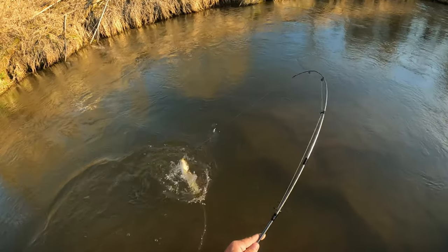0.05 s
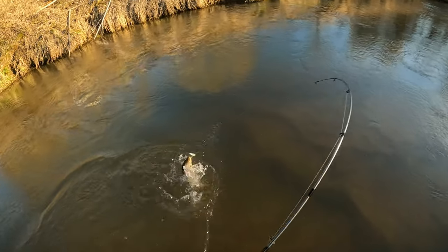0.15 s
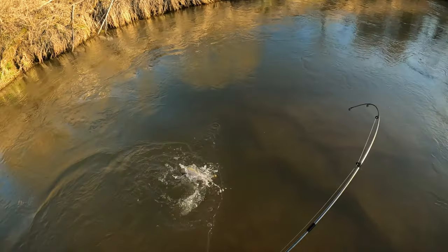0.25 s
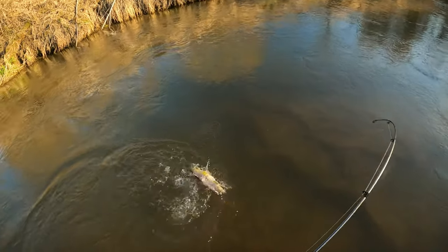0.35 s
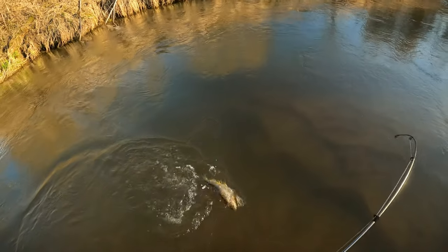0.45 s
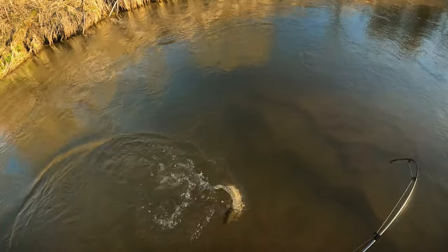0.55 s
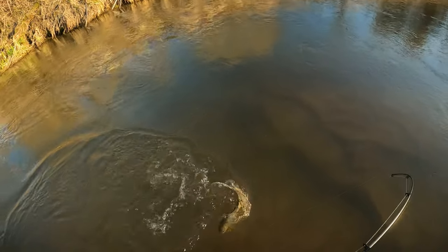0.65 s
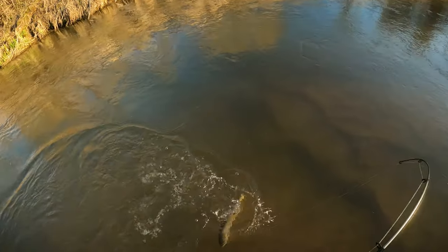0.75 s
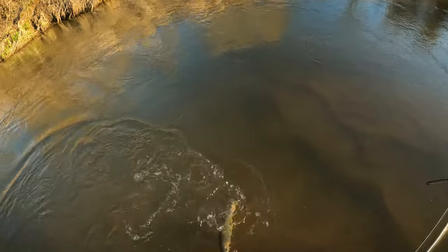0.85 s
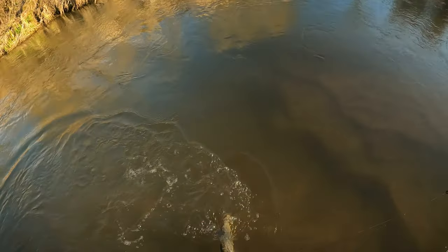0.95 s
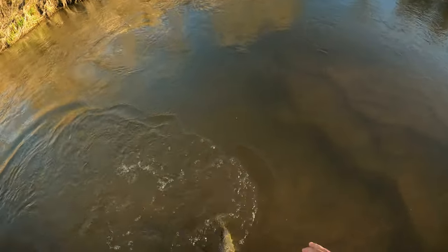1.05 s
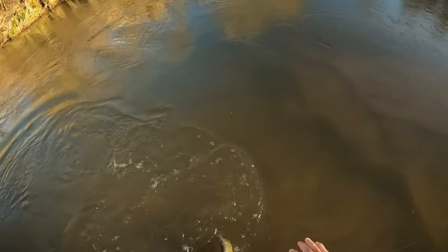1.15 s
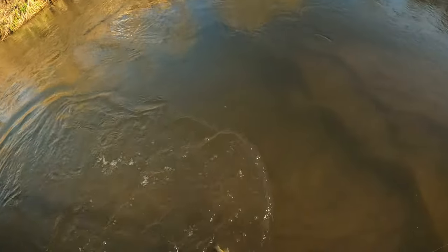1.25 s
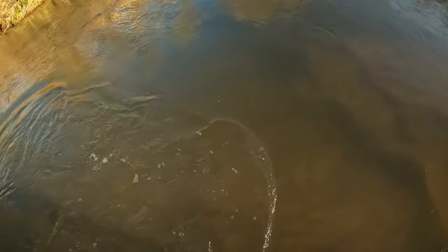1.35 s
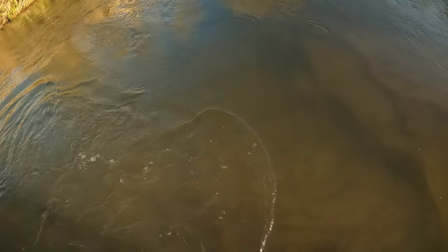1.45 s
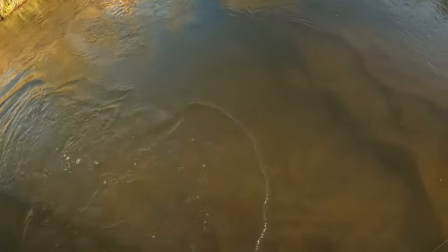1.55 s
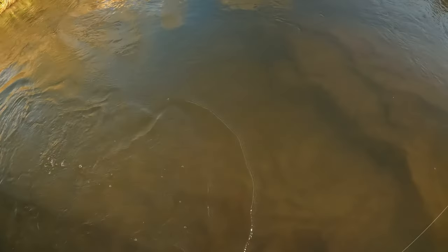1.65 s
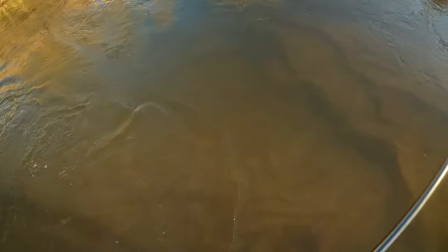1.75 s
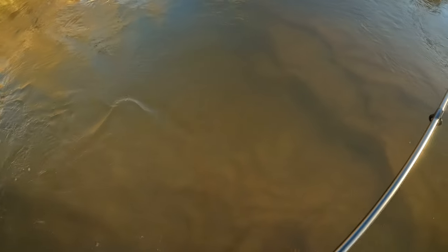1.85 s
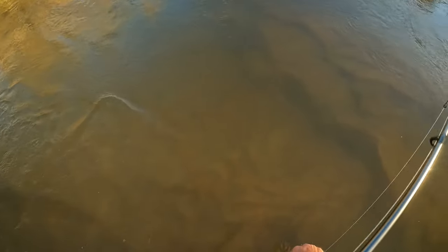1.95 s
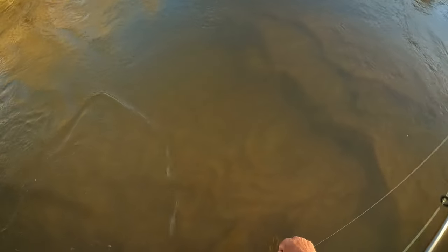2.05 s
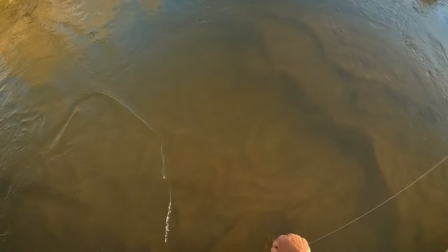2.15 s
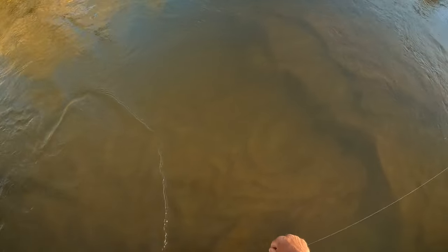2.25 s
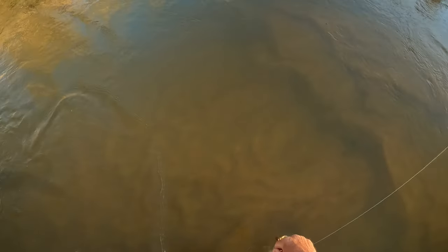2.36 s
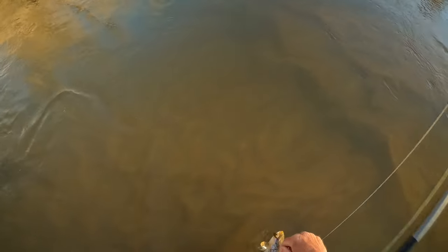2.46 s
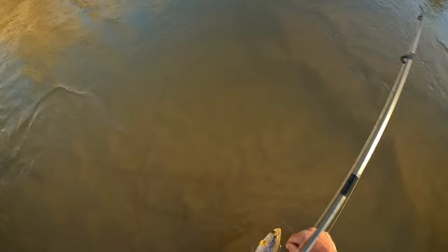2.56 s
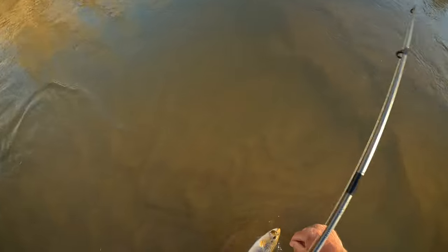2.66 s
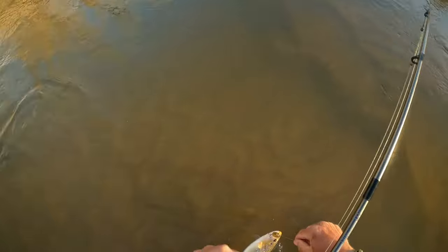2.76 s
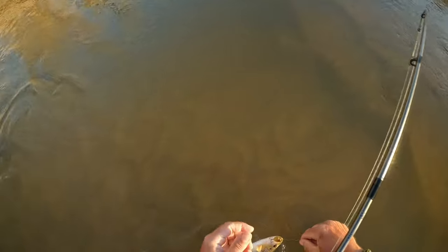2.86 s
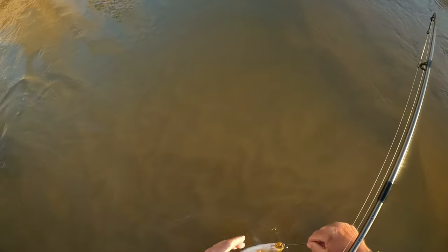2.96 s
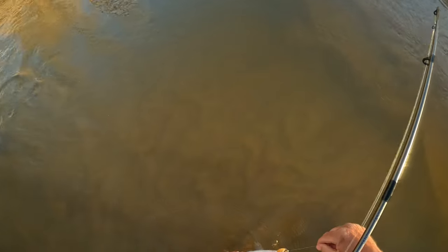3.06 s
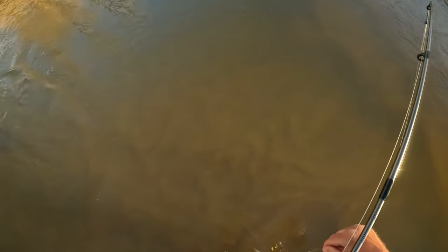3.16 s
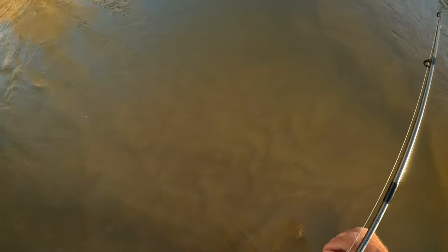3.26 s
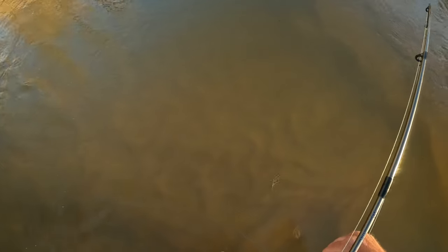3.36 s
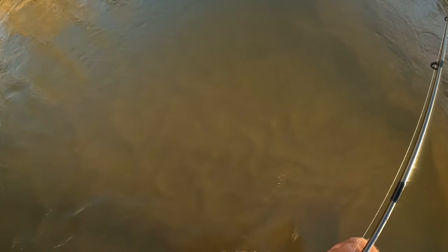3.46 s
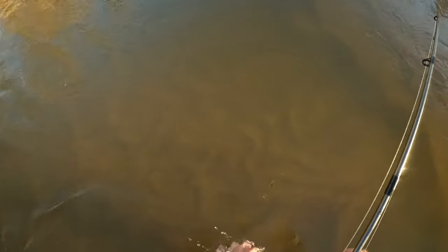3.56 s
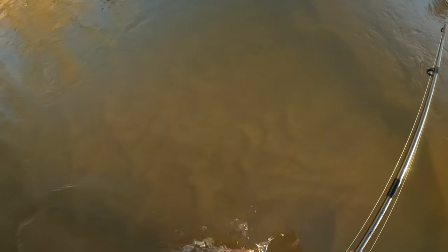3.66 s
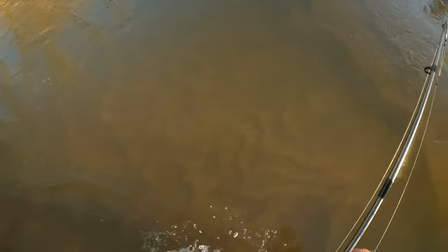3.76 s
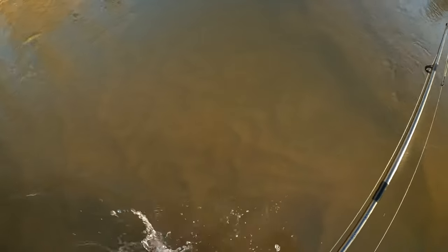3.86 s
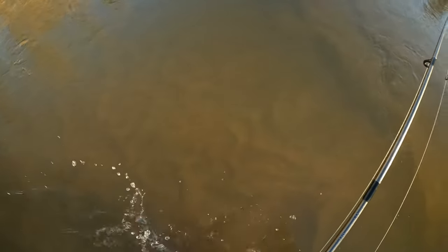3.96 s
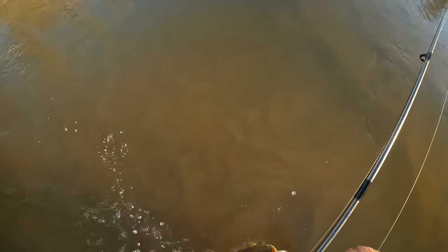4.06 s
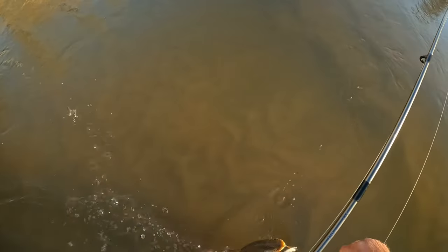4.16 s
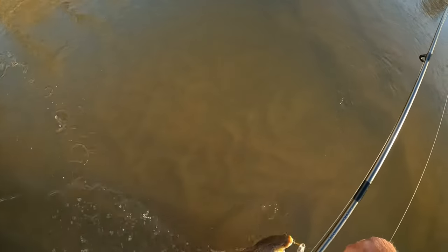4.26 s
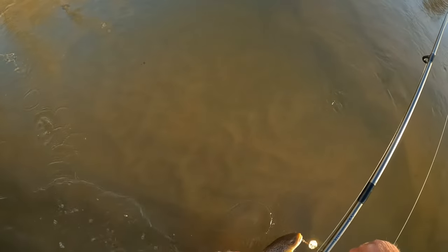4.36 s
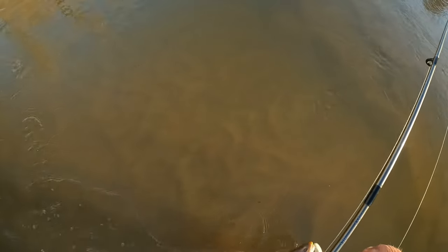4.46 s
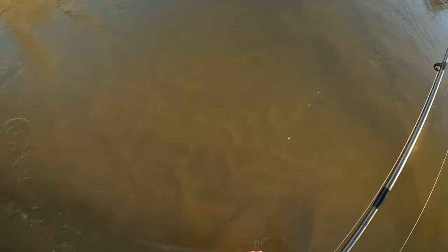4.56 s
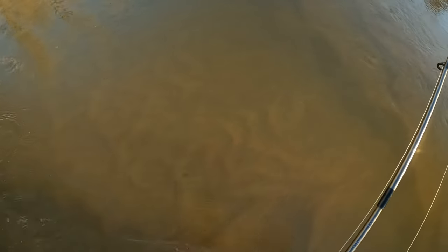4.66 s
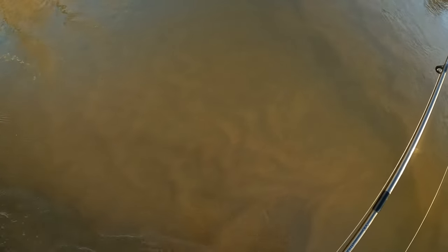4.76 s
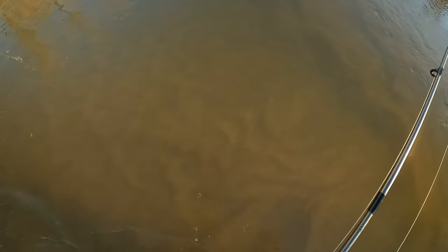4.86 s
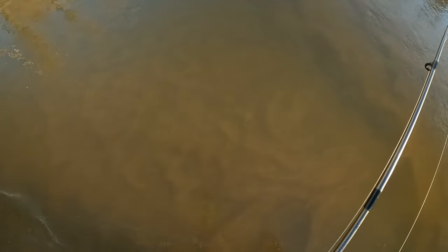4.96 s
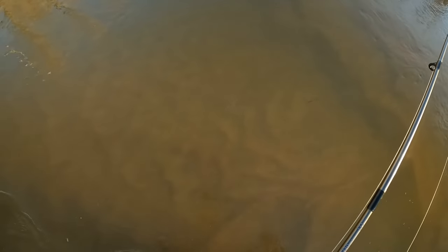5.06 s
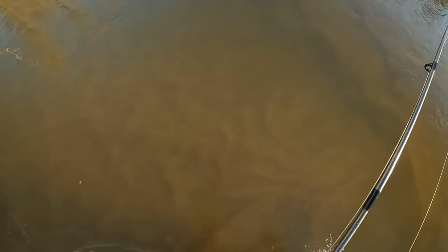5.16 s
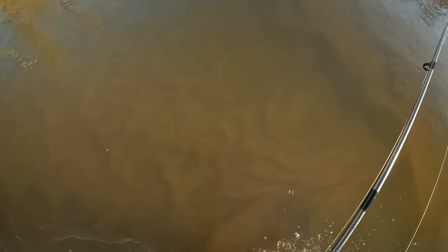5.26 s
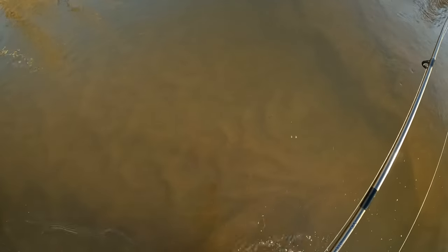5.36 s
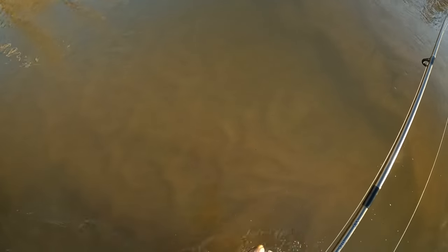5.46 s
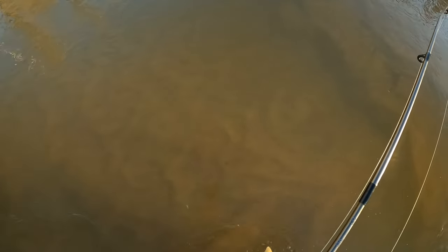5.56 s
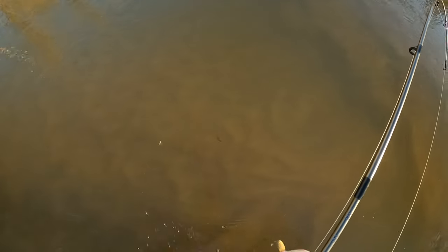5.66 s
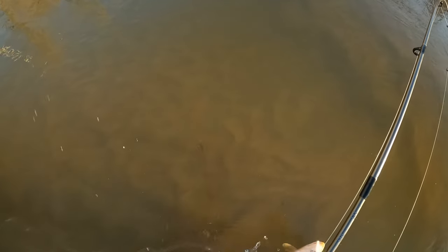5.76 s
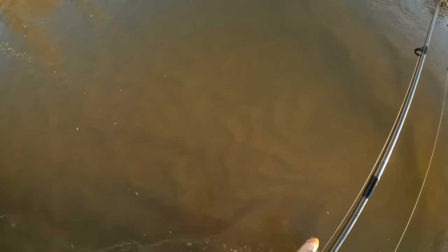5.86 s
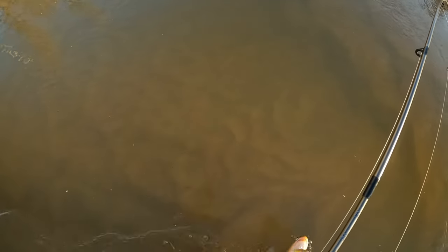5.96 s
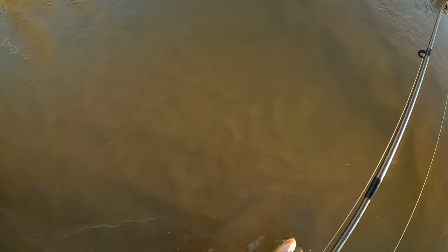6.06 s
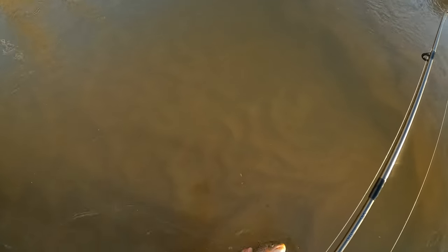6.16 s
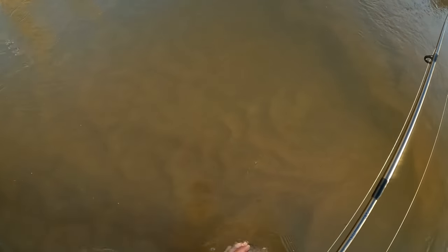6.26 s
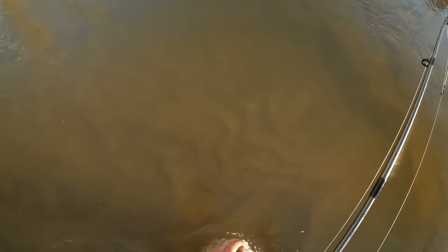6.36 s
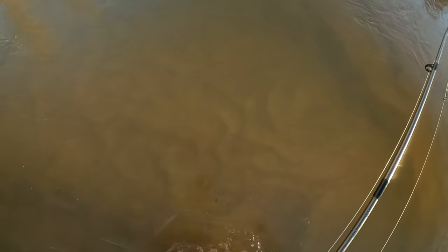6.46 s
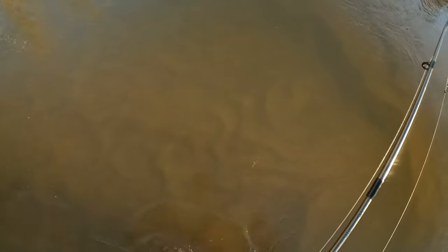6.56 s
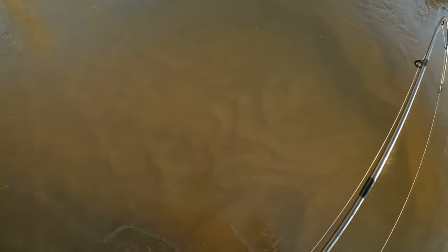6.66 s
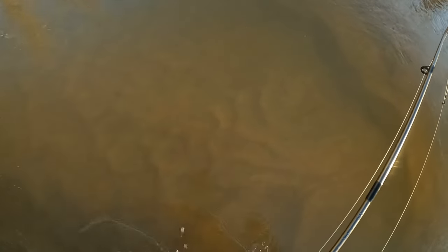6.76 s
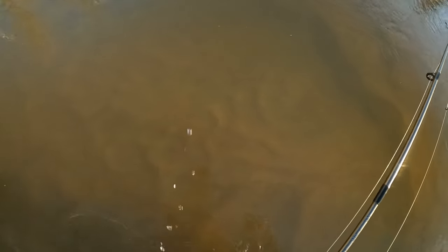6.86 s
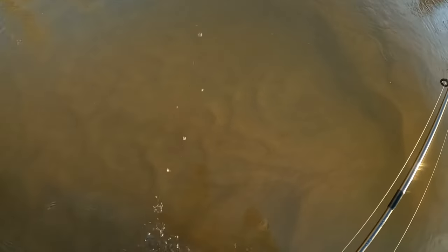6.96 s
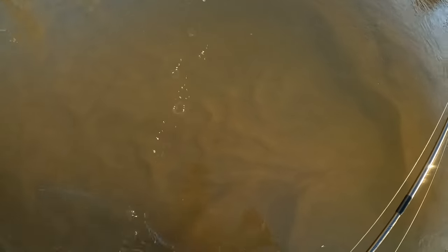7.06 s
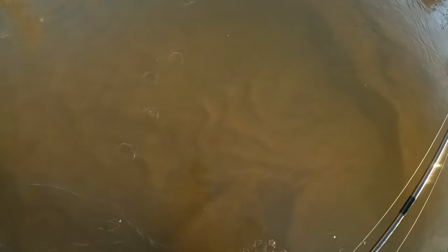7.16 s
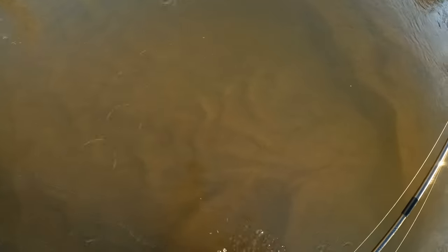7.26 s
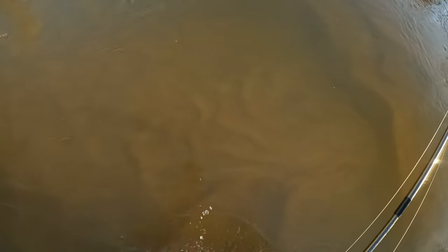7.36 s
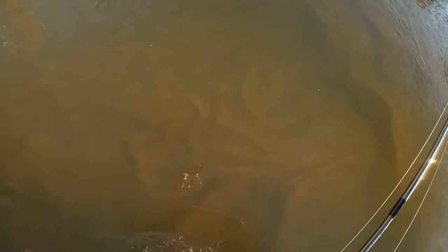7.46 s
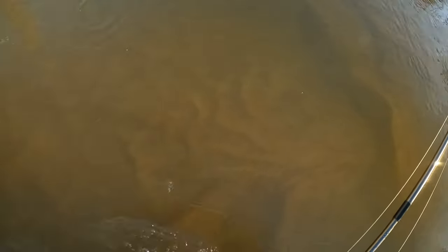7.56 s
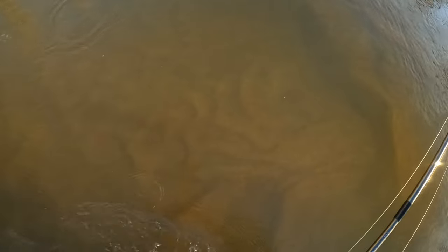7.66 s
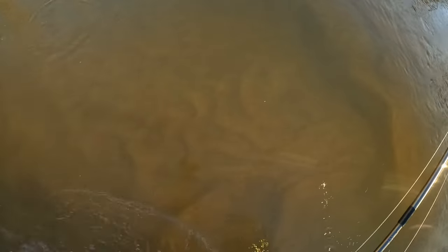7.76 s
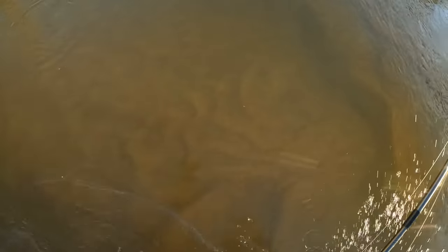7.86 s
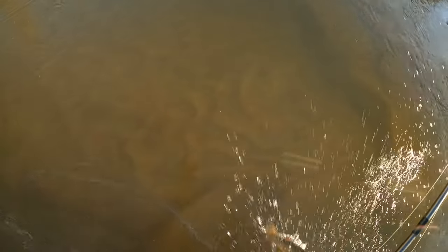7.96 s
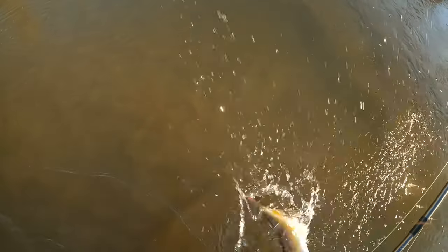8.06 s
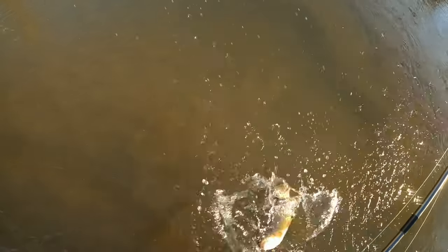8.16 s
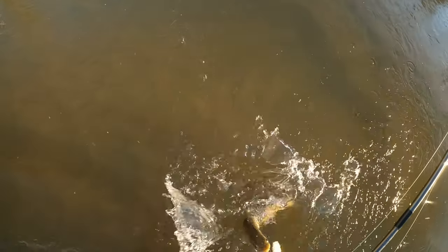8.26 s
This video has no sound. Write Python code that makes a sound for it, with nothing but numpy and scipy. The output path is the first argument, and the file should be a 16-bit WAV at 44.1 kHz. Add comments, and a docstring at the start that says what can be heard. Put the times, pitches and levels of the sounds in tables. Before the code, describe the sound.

A hooked fish thrashes at the surface of a stream, close below a chest-worn stereo microphone. From the start to about 1 second, quick wet slaps throw up spray, with ticking drops, gurgling bubbles and a dull thump of falling water. From 1 to 3.6 seconds the water is calmer: drips, small plops, a couple of light slaps and soft thumps. A distant bird trills once, very faintly, near 3.3 seconds. At 3.7 seconds the thrashing returns, with sharp, loud slaps around 3.8 to 4, then irregular bursts near 4.9, 5.3, 6.4 and 6.9 seconds. The steel lure tinkles lightly among the splashes. Heavy water thumps down around 7.7 seconds, and a strong splash with hissing spray follows from 8 seconds to the end, at about 8.3. Throughout, low wind rumble swells and eases on the microphone over a faint, steady hiss.

```python
"""At the surface of a stream, a hooked fish thrashes close below a chest-worn microphone pair. Its blows slap
the water and throw up spray, which lands as ticking drops; short low knocks thud now and then. Trapped air
resonates as bubbles and closing pockets, and the steel lure in its jaw tinkles in its own modes. Wind eddies
rumble on both microphone ports over a faint hiss and low murmur; a bird trills once."""
import sys
import numpy as np
from scipy.fft import rfft, irfft, next_fast_len
from scipy.io import wavfile
from scipy.ndimage import map_coordinates

SR = 44100
rng = np.random.default_rng(int(sys.argv[2]) if len(sys.argv) > 2 else 0)


def transcribe(u):
    """Save the signal u as a 16-bit wav file named by the first command-line argument.

    u: samples, shape (n,) or (channels, n), limited to [-1, 1]; the rate is SR.
    q: integer samples, one column per channel.
    """
    v = np.clip(np.atleast_2d(u).T, -1, 1)
    q = np.round(v * 32767).astype(np.int16)
    wavfile.write(sys.argv[1], SR, q)


N = 366909

WIND_LEVELS = [(0.0, -41, -51.5), (0.3, -25.5, -42), (0.85, -34.5, -56.5), (1.0, -34, -46.5),
               (1.12, -24, -48), (1.24, -30, -45), (1.33, -24.5, -40.5), (1.42, -29, -44.5),
               (1.55, -23, -43), (1.92, -34.5, -58.5), (2.3, -28.5, -49), (2.53, -23, -43.5),
               (2.68, -27, -51.5), (3.0, -28.5, -48.5), (3.4, -34, -53.5), (4.1, -30.5, -59),
               (4.6, -37.5, -60), (4.9, -27.5, -53), (5.9, -35.5, -55), (6.19, -31, -55.5), (6.3, -38, -57),
               (6.65, -29.5, -63), (6.78, -25, -43.5), (6.85, -45, -63), (6.93, -33.5, -45.5),
               (7.2, -25, -67), (8.0, -29.5, -48), (8.1, -19.5, -51), (8.32, -35, -54)]  # strength of the wind: time_s, rumble_db, flutter_db
FISH_LUNGES = [(0.0, 0.1, -39.5, -48), (0.183, 0.25, -40.5, -39.5), (0.523, 0.17, -47, -46),
               (0.841, 0.14, -44.5, -50), (1.276, 0.21, -49, -50.5), (1.68, 0.092, -48, -78),
               (1.94, 0.073, -50.5, -54.5), (2.334, 0.044, -53.5, -57), (2.713, 0.013, -51, -41.5),
               (3.171, 0.2, -55.5, -53), (3.717, 0.016, -36, -36), (3.762, 0.15, -37, -64),
               (3.873, 0.17, -34.5, -36), (4.226, 0.6, -47, -59), (4.658, 0.32, -44.5, -41.5),
               (4.85, 0.26, -38.5, -41.5), (5.223, 0.2, -38, -37.5), (5.53, 0.024, -45.5, -44.5),
               (5.692, 0.041, -40, -75), (5.872, 0.052, -41, -49.5), (6.04, 0.14, -50, -59),
               (6.446, 0.027, -50.5, -49.5), (6.583, 0.21, -44.5, -44), (6.834, 0.29, -38, -46.5),
               (7.23, 0.21, -39.5, -41), (7.609, 0.06, -39.5, -50), (7.822, 0.27, -38, -61.5),
               (8.207, .04, -36.5, -57), (8.275, .08, -32.5, -43.5)]  # lunges that throw water up: start_s, hold_s, spray_db, gurgle_db
BODY_SLAPS = [(0.058, -23.5, 5540), (0.131, -24, 4580), (0.168, -21.5, 4800), (0.198, -16, 5460),
              (0.3267, -11.5, 2280), (0.4697, -16.5, 1970), (0.619, -18, 1930), (0.8064, -25, 3880),
              (0.854, -20.5, 3400), (0.87, -16, 2770), (0.919, -19.5, 1930), (0.953, -14.5, 2780),
              (2.6806, -24, 1930), (3.18, -20.5, 2010), (3.317, -28.5, 3710), (3.6624, -23, 1750),
              (3.673, -23.5, 6500), (3.685, -15.5, 1920), (3.707, -24, 4970), (3.7818, -7, 4400),
              (3.8384, -12.5, 7150), (3.864, -6, 3500), (3.902, -22, 3000), (3.9832, -10, 2760),
              (3.9918, -9.5, 3240), (4.157, -20.5, 1810), (4.311, -22.5, 2020), (4.424, -20.5, 3900),
              (4.728, -20, 4700), (4.8434, -9, 5400), (4.9082, -11, 1860), (5.011, -20, 1840),
              (5.0813, -21.5, 3240), (5.1606, -17.5, 3660), (5.228, -14.5, 1680), (5.281, -14, 3350),
              (5.291, -11, 2980), (5.303, -14.5, 3140), (5.415, -18.5, 2760), (5.5732, -22, 2120),
              (5.6457, -16, 1780), (5.668, -18, 2640), (5.835, -19, 5500), (5.8595, -19.5, 6660),
              (5.9, -19.5, 1700), (6.064, -23, 3530), (6.14, -32.5, 6500), (6.199, -34.5, 6600),
              (6.228, -24, 2930), (6.416, -14, 2120), (6.4504, -16, 6200), (6.4635, -16.5, 3540),
              (6.532, -26, 2950), (6.636, -17, 5500), (6.722, -25, 3080), (6.781, -19.5, 1480),
              (6.913, -13.5, 2060), (6.9274, -9, 2320), (7.0768, -18.5, 3650), (7.225, -15.5, 2720),
              (7.312, -18.5, 2330), (7.631, -15, 2700), (7.6948, -13.5, 6000), (7.75, -10, 5860),
              (7.8009, -17, 5660), (7.869, -21, 2480), (7.928, -16.5, 4950), (7.9973, -12, 7100),
              (8.056, -22, 4000), (8.088, -14, 5460), (8.1225, -4.5, 2670), (8.189, -12, 4000)]  # blows on the surface: start_s, level_db, centre_hz
TRAPPED_BUBBLES = [(0.062, -25.5, 2360, 0.0052), (0.182, -15, 923, 0.004), (0.19, -36, 243, 0.014),
                   (0.283, -22, 3620, 0.0028), (0.328, -23, 690, 0.0032), (0.351, -30, 303, 0.0066),
                   (0.422, -35, 1005, 0.012), (0.455, -31, 960, 0.0062), (0.465, -36, 1235, 0.0099),
                   (0.623, -16.5, 984, 0.011), (0.63, -29.5, 1160, 0.016), (0.855, -27.5, 1116, 0.015),
                   (0.925, -22, 865, 0.017), (1.367, -40, 1100, 0.0077), (1.653, -21, 3680, 0.0035),
                   (1.741, -41, 950, 0.014), (1.79, -40.5, 1034, 0.0093), (2.138, -33, 930, 0.014),
                   (2.213, -26, 1030, 0.0043), (2.286, -38, 1330, 0.0068), (2.679, -18.5, 1340, 0.002),
                   (2.726, -25.5, 1150, 0.0035), (3.183, -31, 480, 0.0088), (3.59, -27, 3150, .002),
                   (3.614, -19.5, 4350, 0.0022), (3.65, -37, 1165, .015), (3.672, -20.5, 353, 0.0036),
                   (3.695, -28.5, 600, 0.0056), (3.718, -31, 600, 0.0063), (3.867, -10.5, 277, 0.012),
                   (3.912, -21.5, 1740, 0.0052), (3.951, -16.5, 880, 0.004), (3.974, -21.5, 900, 0.021),
                   (3.989, -27.5, 1826, 0.021), (3.994, -25, 367, 0.0094), (4.055, -33, 1150, 0.005),
                   (4.115, -34, 1290, .01), (4.416, -29.5, 1790, 0.0063), (4.432, -28, 1315, 0.0057),
                   (4.644, -31.5, 2070, 0.0053), (4.699, -29, 1057, 0.0073), (4.755, -32, 610, 0.013),
                   (4.775, -28.5, 564, 0.026), (4.786, -31, 1360, .009), (4.831, -31, 630, 0.011),
                   (4.877, -27.5, 2760, 0.0048), (4.901, -6.5, 760, 0.0015), (4.913, -8, 943, 0.0035),
                   (4.957, -24.5, 769, 0.013), (5.014, -27, 3140, 0.004), (5.015, -24.5, 700, 0.0039),
                   (5.154, -34, 660, .008), (5.227, -16.5, 1640, 0.0047), (5.281, -25.5, 388, 0.014),
                   (5.302, -25.5, 538, 0.014), (5.313, -25, 332, 0.016), (5.34, -29.5, 650, 0.011),
                   (5.377, -34, 2320, 0.0061), (5.42, -34, 1790, .006), (5.589, -23, 1116, 0.0088),
                   (5.646, -20.5, 1285, 0.0051), (5.67, -9.5, 2580, 0.002), (5.681, -30.5, 904, 0.013),
                   (5.706, -29.5, 1045, 0.017), (5.903, -19.5, 1590, 0.0066), (5.902, -27.5, 790, 0.011),
                   (5.935, -33, 1460, 0.008), (5.969, -35, 1025, 0.015), (6.068, -36.5, 955, 0.019),
                   (6.352, -34, 3030, 0.0032), (6.533, -35.5, 900, 0.016), (6.581, -28, 770, 0.0053),
                   (6.594, -34, 2100, 0.012), (6.595, -30.5, 730, 0.032), (6.604, -29, 1670, 0.0053),
                   (6.635, -20, 1105, 0.0069), (6.67, -29, 1280, 0.0073), (6.672, -37.5, 396, 0.02),
                   (6.712, -28, 1780, 0.0063), (6.744, -30.5, 1820, 0.0056), (6.833, -11, 1054, 0.0031),
                   (6.884, -29, 1404, 0.017), (6.934, -29, 904, 0.017), (7.043, -30, 1570, 0.0043),
                   (7.055, -32, 1320, .007), (7.09, -30, 990, 0.0057), (7.103, -20.5, 1370, 0.0035),
                   (7.127, -18, 346, 0.013), (7.141, -21.5, 1015, 0.0078), (7.195, -33, 1000, 0.011),
                   (7.207, -32, 1690, 0.0071), (7.223, -21, 1240, 0.004), (7.249, -27.5, 1074, 0.022),
                   (7.267, -28, 1750, 0.004), (7.28, -29.5, 452, 0.015), (7.347, -17.5, 1232, 0.0096),
                   (7.394, -14.5, 962, 0.0059), (7.415, -27.5, 1017, 0.0089), (7.459, -29.5, 2480, 0.007),
                   (7.619, -27, 1590, 0.0053), (7.673, -16, 1310, 0.0036), (7.8, -28, 620, 0.0052),
                   (7.838, -33.5, 1480, 0.0052), (7.944, -22.5, 1336, 0.0042), (8.07, -18.5, 947, 0.0085),
                   (8.159, -35, 636, 0.022), (8.191, -17, 548, 0.013), (8.201, -27.5, 756, 0.0094),
                   (8.294, -30, 820, 0.0075), (8.301, -27, 1990, 0.004), (8.311, -19, 1160, 0.0026)]  # single ringing bubbles: start_s, level_db, pitch_hz, life_s
LOW_KNOCKS = [(0.185, -18.5), (0.207, -18), (1.749, -37), (1.999, -33.5), (2.568, -28), (2.724, -25.5),
              (2.82, -35), (2.998, -28), (3.177, -35), (3.517, -28), (3.668, -24), (4.903, -28),
              (5.064, -30), (7.693, -16), (7.721, -22), (7.74, -17.5), (7.8, -24.5), (7.997, -26.5)]  # short low knocks: start_s, level_db
# large closing air pockets: start_s, length_s, first_hz, last_hz, glide_exponent, level_db
AIR_POCKETS = [(0.25, 0.18, 159.3, 644, 2.5, -39.5), (0.641, 0.022, 405, 654, 1.13, -37.5),
               (0.66, 0.076, 662, 815, 1.4, -44.5), (0.945, 0.11, 354, 1390, 2.77, -33.5),
               (0.978, 0.031, 750, 1370, 1.1, -39), (3.873, 0.048, 136, 318, 1.02, -31.5),
               (3.924, 0.11, 323, 335, 0.5, -35.5), (3.902, 0.015, 446, 900, 0.88, -18.5),
               (4.399, 0.15, 292, 636, 3.1, -41), (4.653, 0.07, 433, 425, 1.1, -36.5),
               (4.849, 0.03, 800, 1000, 1.1, -36), (4.96, 0.08, 415, 820, 1.19, -35),
               (5.382, 0.087, 338, 542, 0.97, -42), (5.544, .055, 492, 915, 0.92, -42),
               (6.287, 0.05, 853, 1410, 1.64, -37.5), (6.966, 0.025, 1510, 2700, 0.92, -31.5),
               (7.212, 0.056, 520, 776, 1, -32.5)]
LURE_CONTACTS = [(0.2663, -39), (3.8367, -31), (3.927, -34), (4.3779, -48), (4.48, -52), (4.9357, -36),
                 (5.0878, -43), (5.49, -49), (5.6, -53), (5.7154, -41), (5.8, -50), (5.945, -50),
                 (6.17, -50), (6.4507, -31), (6.55, -48), (6.8354, -38), (7.04, -43), (7.1217, -39),
                 (7.2315, -46), (7.3632, -47), (7.415, -43), (7.5448, -32), (7.6326, -41), (7.7508, -36),
                 (7.7852, -36), (7.8007, -33), (7.8446, -42), (7.9289, -38), (8.0875, -35), (8.1539, -36),
                 (8.2297, -34), (8.2526, -30)]  # knocks on the lure's blade: start_s, level_db
BLADE_MODES = [(2830, -3, .12), (5572, -7, .1), (7052, -11, .07), (8597, 0, .055), (8830, -7, .04),
               (11800, -12, .04), (13050, -2, .05), (13800, -10, .04)]  # resonances of the blade: pitch_hz, level_db, t60_s

# Spectral envelopes of the noisy sources: frequency_hz, gain_db
RUMBLE_SPECTRUM = [(2, 20), (5, 23), (22, 18.5), (32, 14), (60, -29), (110, -54), (400, -120)]  # slow wind pressure
FLUTTER_SPECTRUM = [(30, -0.5), (55, 3.5), (110, -13), (200, -23), (450, -24), (900, -42.5), (3000, -120)]  # faster buffeting
BACKGROUND_SPECTRUM = [(120, 1.5), (200, 5.5), (300, -23), (640, -28), (790, -24), (1190, 0), (2300, -20.5),
                       (2900, 0.5), (3400, -18), (6800, -23.5), (8000, -30.5), (11000, -31), (13500, -38)]  # faint hiss and low murmur
DROP_SPECTRUM = [(150, -94), (500, -70), (1200, -25), (1600, -1.5), (2900, 0.5), (5300, -3), (6800, -1.5),
                 (7800, -33.5), (10000, -38)]  # falling drops
MIST_SPECTRUM = [(3000, -91), (6900, 5.5), (8200, -6.5), (10600, 2), (13400, -2.5), (14300, -39)]  # the finest spray
FROTH_SPECTRUM = [(60, -92), (150, -9), (300, -9.5), (600, -11), (1100, -1.5), (1500, -7), (3000, -2),
                  (8000, -100)]  # churned surface

PORT_LIKENESS = [(200, .99), (700, .97), (1400, .93), (2900, .8), (5500, .88), (10000, .75), (13000, -.2)]  # likeness of left and right: frequency_hz, correlation
PORT_BALANCE = [(500, -.8), (2500, -1.7), (5000, 0), (9000, 0), (13000, -6)]  # level difference of the ports: frequency_hz, left_minus_right_db

LUNGE_RISE_DB_PER_S = 140
SPRAY_ENVELOPE = dict(column=2, fall_db_per_s=93, calm_db=-58.5)  # calm: drips and lapping between lunges
GURGLE_ENVELOPE = dict(column=3, fall_db_per_s=118, calm_db=-68)
BAND_LIMIT_HZ = 14300


def amp(db):
    return 10 ** (np.asarray(db) / 20)


def unit_rms(x):
    return x / np.sqrt(np.mean(x ** 2) + 1e-20)


def along(points, hz):
    """Interpolates (frequency_hz, value) points on a logarithmic frequency axis."""
    knots_hz, values = np.transpose(points)
    return np.interp(np.log(hz + 1), np.log(knots_hz + 1), values)


def wobble(knots_per_s):
    """A smooth random curve: a spline through Gaussian knots."""
    knots = rng.standard_normal(int(N * knots_per_s / SR) + 4)
    return map_coordinates(knots, [np.arange(N) * knots_per_s / SR])


def filtered(x, response):
    """Linear filtering: multiplies the spectrum of x by response(hz)."""
    size = next_fast_len(N + SR // 4)
    return irfft(rfft(x, size) * response(np.fft.rfftfreq(size, 1 / SR)), size)[..., :N]


def coloured(x, spectrum):
    return filtered(x, lambda hz: amp(along(spectrum, hz)))


def glide(hz):
    """A sine whose phase is the integral of its frequency."""
    return np.sin(2 * np.pi * np.cumsum(hz) / SR)


def add(track, start_s, sound):
    """Superposes a short sound on the track."""
    part = track[round(start_s * SR):][:len(sound)]
    part += sound[:len(part)]


def side_angle(hz):
    """The mid-side mixing angle that sets the left-right correlation at each frequency."""
    return np.arccos(np.clip(along(PORT_LIKENESS, hz), -1, 1)) / 2


def wind():
    """Turbulent pressure, partly correlated at the ports, harder on the right; strong gusts reach higher."""
    times_s, *levels = np.transpose(WIND_LEVELS)
    rumble_db, flutter_db = [np.interp(np.arange(N) / SR, times_s, db) for db in levels]
    shared, own = rng.standard_normal((2, 3, N))
    sides = np.array([shared + 0.12 * own, shared - 0.59 * own])
    rumble = unit_rms(coloured(sides[:, 0], RUMBLE_SPECTRUM))
    eddies = wobble(12)
    flutter = unit_rms(amp(3.3 * eddies) * coloured(sides[:, 1], FLUTTER_SPECTRUM))
    rush = coloured(shared[2], [(30, -72), (90, 19.5), (160, 1), (320, 1), (700, -63), (2500, -110)])
    gust = amp(-58.5 + 2.3 * (flutter_db + 50)) * unit_rms(amp(2.3 * eddies) * rush)
    return (amp(rumble_db) * rumble + amp(flutter_db + 8) * flutter) * amp([[-1.7], [1.7]]) + gust


def background():
    """Noise floor: a faint, nearly steady hiss and low murmur, with a narrow band near 2.9 kHz."""
    pair = coloured(rng.standard_normal((2, N)), BACKGROUND_SPECTRUM)
    mid = filtered(pair[0], lambda hz: np.cos(0.45 * side_angle(hz)))
    side = filtered(pair[1], lambda hz: np.sin(2 * side_angle(hz)))
    return amp(-54 + 2.2 * wobble(3.855)) * unit_rms(np.array([mid + side, mid - side]))


def lunge_level_db(column, fall_db_per_s, calm_db):
    """Incoherent sources add in power: each lunge rises, holds and falls over the calm water."""
    t, lunges = np.arange(0, N, 64) / SR, np.array(FISH_LUNGES)
    start_s, end_s = lunges[:, :1], lunges[:, :1] + lunges[:, 1:2]
    before_db = LUNGE_RISE_DB_PER_S * np.maximum(start_s - t, 0)
    after_db = fall_db_per_s * np.maximum(t - end_s, 0)
    each_db = lunges[:, column, None] - before_db - after_db
    power = amp(2 * each_db).sum(axis=0) + amp(2 * calm_db)
    return np.interp(np.arange(N) / SR, t, 10 * np.log10(power))


def grains(count, hz, spread, cycles, scatter_db, rise, samples, floor):
    """Damped rising oscillators at random times, log-normal in pitch; floor limits the strongest."""
    moment, rank = np.hsplit(rng.random((count, 2)), 2)
    pitch_hz = np.clip(hz * np.exp(spread * rng.standard_normal((count, 1))), 100, SR / 2.5)
    turns = pitch_hz * np.arange(samples) / SR
    envelope = (1 - np.exp(-turns / 0.45)) * np.exp(-turns / cycles) * np.hanning(2 * samples)[samples:]
    strength = amp(-scatter_db * np.log(rank + floor)) * np.sqrt(pitch_hz / hz)
    rings = strength * envelope * np.sin(2 * np.pi * turns * (1 + rise * turns / cycles))
    positions = (moment * N).astype(int) + np.arange(samples)
    return unit_rms(np.bincount(positions.ravel(), rings.ravel(), N + samples)[:N])


def spray():
    """Drop impacts tick, plink and hiss; entrained air gurgles, and chirps upward under larger drops."""
    spray_db, gurgle_db = lunge_level_db(**SPRAY_ENVELOPE), lunge_level_db(**GURGLE_ENVELOPE)
    surge = np.tanh(wobble(30))
    ticks = grains(3500, hz=5200, spread=.45, cycles=3.5, scatter_db=4, rise=.02, samples=200, floor=.05)
    plinks = grains(2200, hz=2800, spread=.5, cycles=10, scatter_db=4.5, rise=.025,
                    samples=700, floor=.05)
    hiss = rng.standard_normal(N)
    patter = amp(-6) * unit_rms(coloured(ticks, DROP_SPECTRUM))
    patter += amp(-6 + .2 * (spray_db + 38)) * unit_rms(coloured(hiss, DROP_SPECTRUM))
    mist = unit_rms(coloured(ticks + amp(-1) * hiss, MIST_SPECTRUM))
    mist_db = -58 + 1.16 * (spray_db + 42)  # harder, nearer splashing is brighter
    froth = grains(2600, hz=875, spread=.424, cycles=3.58, scatter_db=1.5, rise=.054,
                   samples=1400, floor=.34)
    chirps = grains(800, hz=1200, spread=.27, cycles=6, scatter_db=4, rise=.03, samples=1300, floor=.15)
    wash = unit_rms(coloured(rng.standard_normal(N), FROTH_SPECTRUM))
    drops = amp(spray_db + 2.5 * surge) * (amp(1.5 * wobble(70)) * patter + amp(-5) * plinks)
    mist *= amp(mist_db + 4.6 * surge + 5.95 * wobble(45))
    chirps *= amp((spray_db + gurgle_db) / 2 - 4 + 5.4 * np.tanh(wobble(14)))
    gurgle = amp(-0.5) * froth + amp(-7.5) * wash
    gurgle *= amp(gurgle_db + 6.3 * surge + 5.1 * np.tanh(wobble(13)))
    return drops + mist + chirps + gurgle


def slaps():
    """Impact of tail and body: a click and a crack in a band set by the size of the blow, then a puff."""
    blows, mist, t = np.zeros(N), np.zeros(N), np.arange(SR // 10) / SR
    lead_s, hz = .004, np.fft.rfftfreq(len(t), 1 / SR)
    after_s = np.maximum(t - lead_s, 0)
    onset = amp(-6000 * np.maximum(lead_s - t, 0))  # each slap swells in over a few milliseconds
    puff = amp(-20 - 60 * after_s / .09)
    for start_s, level_db, centre_hz in BODY_SLAPS:
        mist_db = -30 + 10 * np.log2(centre_hz / 2000)  # small sharp slaps throw more mist
        t60_s = 0.02 * np.exp(rng.normal(0, 0.2))
        burst = onset * (amp(-60 * after_s / t60_s) + puff) * rng.standard_normal(len(t))
        band = amp(-1.5) + np.exp(-(np.log(hz / centre_hz + 1e-9) / 0.35) ** 2)
        crack = irfft(rfft(burst) * band, len(t))
        click = amp(7 - 60 * after_s / 0.0035) * np.sin(2 * np.pi * centre_hz * after_s)
        onset_s = max(start_s + 0.00124 - lead_s, 0)
        add(blows, onset_s, amp(level_db - 5) * (crack + click))
        add(mist, onset_s, amp(level_db + mist_db) * burst)
    blows = coloured(blows, [(300, -69), (1200, 0), (2500, -1), (6800, -3), (7800, -31), (10000, -51)])
    return blows + coloured(mist, MIST_SPECTRUM)


def churn_gain(depth, knots_per_s):
    """Amplitude modulation: the more the surface gurgles, the more it hides and bares a ringing bubble."""
    above_calm_db = lunge_level_db(**GURGLE_ENVELOPE) - GURGLE_ENVELOPE["calm_db"]
    return amp(depth * above_calm_db * np.minimum(wobble(knots_per_s), .5))


def bubbles():
    """Bubble resonance: trapped air rings as a damped, unsteady sine that climbs as it nears the surface."""
    out, waver = np.zeros(N), wobble(140)
    for start_s, level_db, pitch_hz, life_s in TRAPPED_BUBBLES:
        t = np.arange(int(3 * life_s * SR)) / SR
        octaves_per_s = 5 * (pitch_hz / 1000) ** 1.56  # small bubbles climb faster
        octaves = np.minimum(octaves_per_s * t, 1) + .08 * np.resize(waver[round(start_s * SR):], len(t))
        swell = np.sin(np.pi / 2 * np.minimum(t / 0.0017, 1)) ** 2
        decay = np.exp(-1.3 * (t / life_s) ** 0.85)
        add(out, start_s - .002, amp(level_db + 5) * swell * decay * glide(pitch_hz * 2 ** octaves))
    return out * churn_gain(depth=.14, knots_per_s=260)


def thumps():
    """Short knocks: each is a brief, rough, low push."""
    out, t = np.zeros(N), np.arange(SR // 10) / SR
    envelope = amp(17 - 60 * t / 0.06) * (1 - np.exp(-t / 0.0024))
    for start_s, level_db in LOW_KNOCKS:
        add(out, start_s, amp(level_db) * envelope * rng.standard_normal(len(t)))
    return coloured(out, [(50, -14), (110, -6.5), (250, -2.5), (500, -9), (1100, -18.5), (4000, -100)])


def pockets():
    """Cavity resonance: each air pocket sings one brief tone, nearly always climbing as it closes."""
    out = np.zeros(N)
    swell_share, close_share, fade_db = 0.032, 0.093, 1.5
    for start_s, length_s, first_hz, last_hz, glide_exponent, level_db in AIR_POCKETS:
        progress = np.linspace(0, 1, int(length_s * SR))
        hz = first_hz * (last_hz / first_hz) ** (progress ** glide_exponent)
        envelope = np.clip(np.minimum(progress / swell_share, (1 - progress) / close_share), 0, 1)
        add(out, start_s, amp(level_db - fade_db * (progress - 1.5)) * envelope * glide(hz))
    return out * amp(2.5 * wobble(60)) * churn_gain(depth=.22, knots_per_s=150)


def lure():
    """Modal vibration: each contact rings the thin wet blade, which rebounds twice and rattles as it slides."""
    out, t = np.zeros(N), np.arange(SR // 8) / SR
    mean_gap_s, rebound_loss_db = .014, 7
    attack = 1 - np.exp(-t / .0008)
    for start_s, level_db in LURE_CONTACTS:
        for rebound in range(3):
            ring = sum(amp(mode_db + rng.normal(0, 4) - 60 * t / t60_s) * np.sin(2 * np.pi * hz * t)
                       for hz, mode_db, t60_s in BLADE_MODES)
            delay_s = rebound * mean_gap_s * (.5 + rng.random())
            add(out, start_s + delay_s, amp(level_db - rebound_loss_db * rebound) * ring * attack)
    return out * amp(5 * np.tanh(wobble(250)) - 5.5)


def bird():
    """Frequency modulation: a far bird trills 52 short notes a second, each sliding down."""
    out, t = np.zeros(N), np.arange(int(.3 * SR)) / SR
    note_phase = (52 * t) % 1
    hz = 3760 + (150 + 1300 * t) * (.5 - note_phase)
    add(out, 3.305, amp(-52) * np.sin(np.pi * note_phase) ** 2 * glide(hz))
    return out


def ports(x):
    """Phase and level differences: the left port hears slightly late, by a lag that shifts as the body sways."""
    mid = filtered(x, lambda hz: np.cos(side_angle(hz)))
    quadrature, in_phase = filtered(x, lambda hz: np.sin(side_angle(hz)) * [[-1j], [1]])
    sway_rad = .8 * wobble(12)
    side = np.cos(sway_rad) * quadrature + np.sin(sway_rad) * in_phase
    pair = np.array([mid + side, mid - side])
    return filtered(pair, lambda hz: amp(along(PORT_BALANCE, hz) * [[.5], [-.5]]))


def scene():
    """Superposition: fish, water and bird reach the two ports over the background hiss and the wind."""
    direct = spray() + slaps() + thumps() + bubbles() + pockets() + lure() + bird()
    return ports(direct) + background() + wind()


def record(dry):
    """Ideal low-pass filtering: nothing passes above the band limit."""
    return filtered(dry, lambda hz: hz < BAND_LIMIT_HZ)


dry = scene()
out = record(dry)
transcribe(out)
```